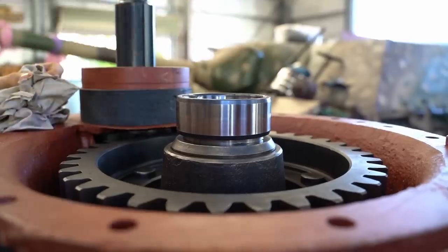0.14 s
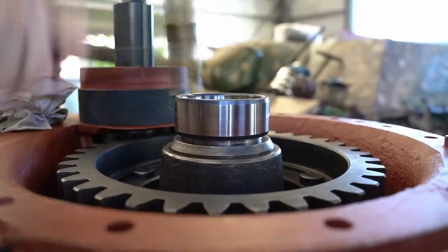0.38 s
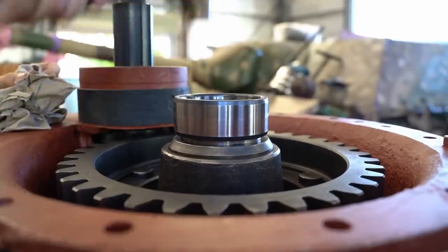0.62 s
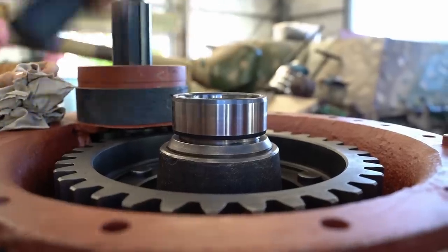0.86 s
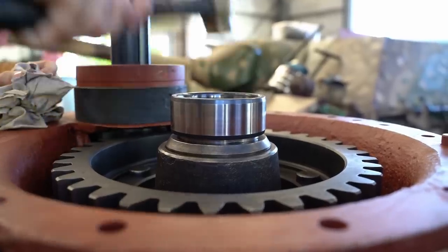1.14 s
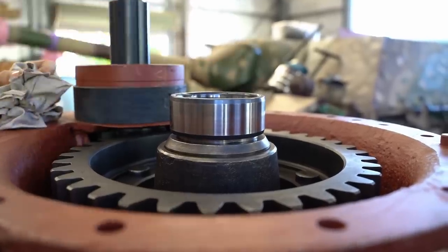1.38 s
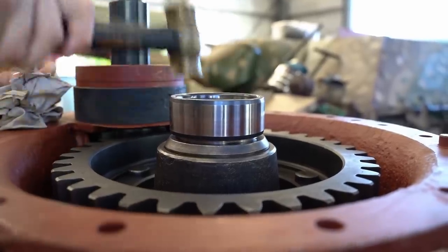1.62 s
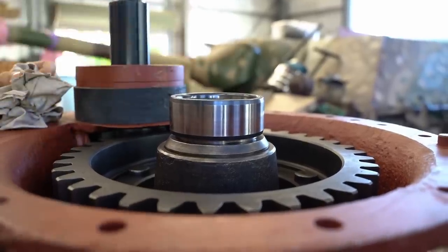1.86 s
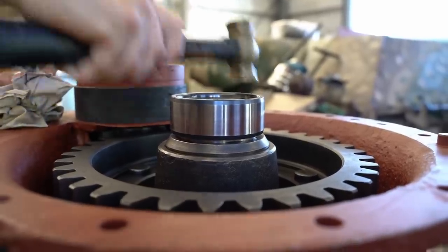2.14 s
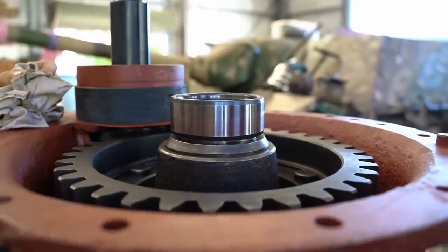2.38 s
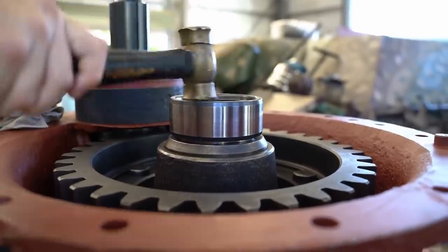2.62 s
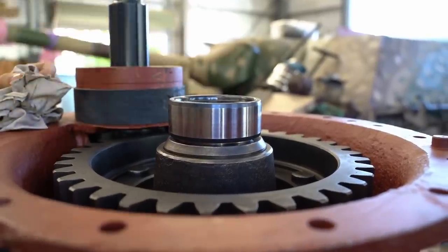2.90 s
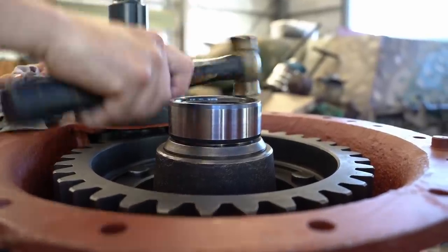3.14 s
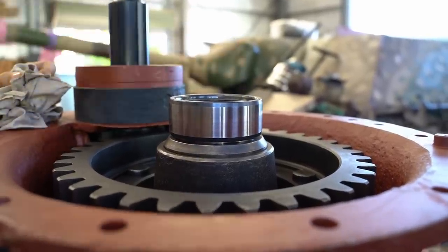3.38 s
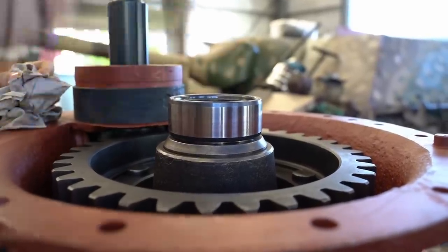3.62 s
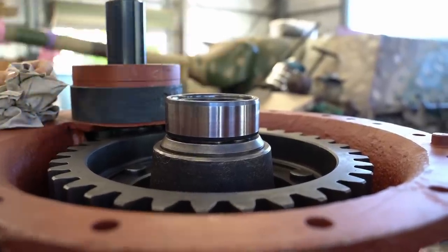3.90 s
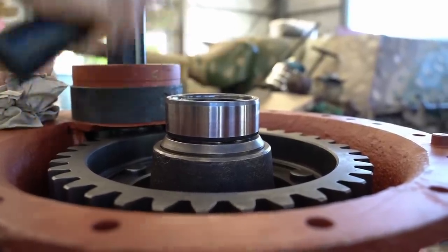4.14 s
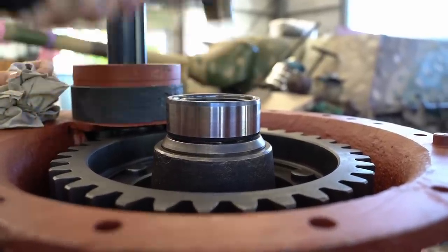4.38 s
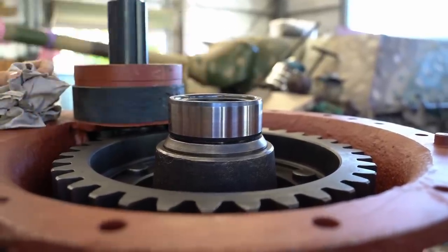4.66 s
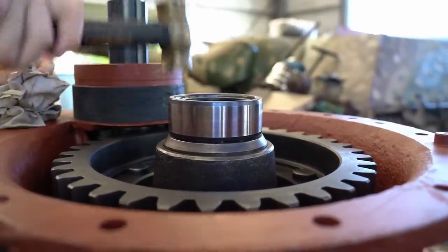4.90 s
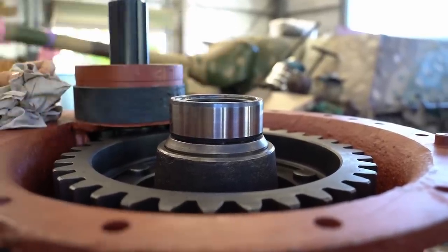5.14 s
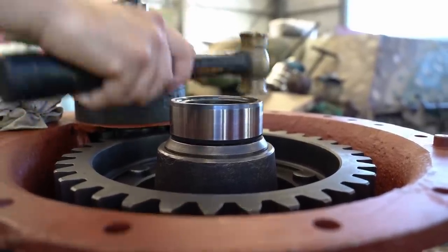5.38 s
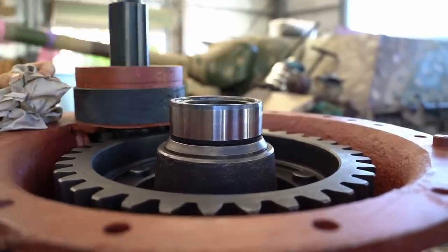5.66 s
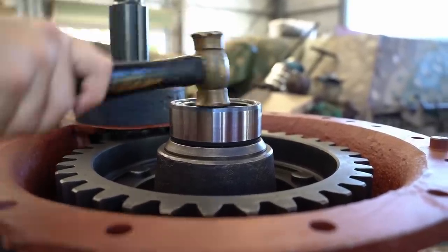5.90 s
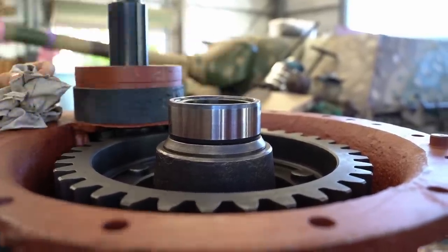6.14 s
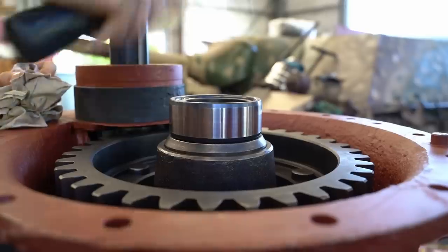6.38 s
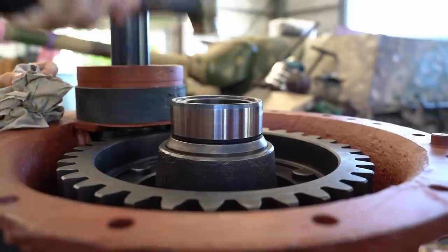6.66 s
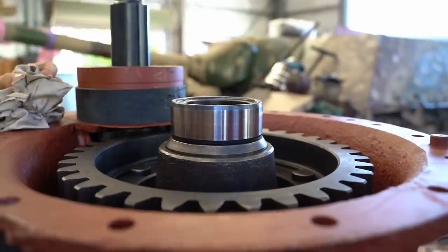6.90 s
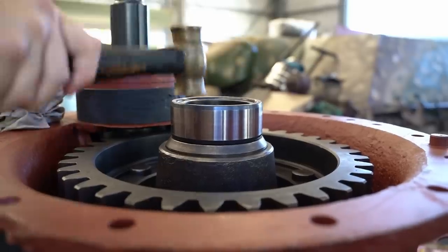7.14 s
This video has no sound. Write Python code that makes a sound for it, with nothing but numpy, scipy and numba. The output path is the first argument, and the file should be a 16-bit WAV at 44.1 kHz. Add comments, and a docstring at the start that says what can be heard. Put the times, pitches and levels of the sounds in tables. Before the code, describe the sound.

At 0 seconds the clang of a blow just struck is dying away, with a faint thin whine lingering until about 0.6. From 0.44 a brass hammer strikes a steel bearing collar on a gear hub, steadily, about every 0.55 seconds, with the last blow near 7.06. Each hit is a sharp, overloaded crack with a spit of noise, a short low thud from the heavy housing, and a dense metallic clang fading within a few tenths. From about 1.0, a lighter bounce taps some 30 to 50 milliseconds after each blow, and loose parts rattle briefly. Alternate hits differ slightly in brightness. High pings are strongest around 2 to 4.3; from 4.8 they weaken, the blows grow duller, and a thin, very high ring creeps upward in pitch. Close microphone, scattered workshop echoes, steady low machine hum underneath.

```python
"""The clang of a blow just struck dies away, then a brass hammer goes on driving a bearing collar
onto the hub of a steel gear, far and near rim in turn. Each blow is a sum of dying sines, for crack,
housing, gear and collar, with bursts of noise; scattered echoes stand for the workshop, which hums low.
A close camera microphone overloads on the crack and its limiter holds down the clang."""
import sys
import numpy as np
from scipy import signal
from scipy.io import wavfile
from scipy.ndimage import uniform_filter1d
from numba import njit

SR = 44100
rng = np.random.default_rng(int(sys.argv[2]) if len(sys.argv) > 2 else 0)


def volts(x):
    """Linear amplitude factor 10**(x/20) for a level x in dB, scalar or array-like."""
    e = np.asarray(x, float) / 20
    return 10 ** e


def materialize(psi):
    """Save the field psi as 16-bit PCM at rate SR to the path in sys.argv[1].

    A 1-D psi becomes a single channel; in a 2-D psi each row is a channel.
    """
    bounded = np.clip(np.atleast_2d(psi).T, -1, 1)
    quanta = np.round(bounded * 32767).astype(np.int16)
    wavfile.write(sys.argv[1], SR, quanta)


N = 321042  # samples
LEAD = SR // 2  # samples of run-up, for the blow that falls before the start

# Loose parts knocking. Each row: frequency in Hz, level in dB, t60 in s.
LOOSE_PARTS = [(640, -4.5, 0.016), (950, -2, 0.011), (1450, 1.5, 0.0078), (2265, -2, 0.013)]


def evened(x):
    """Scales to rms 1."""
    return x / np.sqrt(np.mean(x ** 2) + 1e-20)


def read(points, hz):
    """Reads a table on a log-frequency axis."""
    f, value = np.transpose(points)
    return np.interp(np.log(hz + 1), np.log(f + 1), value)


def add(mix, s, sound):
    """Lays a sound into a mix that begins LEAD samples early."""
    part = mix[LEAD + round(s * SR):][:len(sound)]
    part += sound[:len(part)]


def ring(modes, rise_s, scatter_db, rim=0., size=SR // 2 + SR // 4):
    """Dying sines that swell up first; level, phase and pitch differ a little each time."""
    hz, db, t60, *far_db = np.transpose(modes)[:, :, None]
    t = np.arange(size) / SR
    level_luck, phase, pitch_luck = rng.standard_normal((3, len(modes), 1))
    level_db = db + rim * sum(far_db) + scatter_db * level_luck - 60 * t / t60
    swell = (1 - np.exp(-t / rise_s)) ** 2
    hz = hz * (1 + .0008 * pitch_luck)  # each mode is detuned a hair at random
    return (volts(level_db) * swell * np.sin(2 * np.pi * hz * t + phase)).sum(0)


def fading(x, t60_table, colour=((1, 0), (2, 0))):
    """Colours x and lets each band die at its own speed."""
    hz, t, z = signal.stft(x, SR, nperseg=256, noverlap=192)
    level_db = read(colour, hz)[:, None] - 60 * t / read(t60_table, hz)[:, None]
    return signal.istft(z * volts(level_db), SR, nperseg=256, noverlap=192)[1][:len(x)]


def hammering():
    """All blows; a rebound lands on the rim of the blow before it and knocks the loose parts."""
    # Blows, the first just before the start. Each row: start in seconds, strength in dB,
    # place on the rim (below 0 near, above 0 far), high ping of the gear in dB, its middle ring in dB.
    blows = [(-.105, -1.5, -0.85, 1, -5), (0.4384, -1.5, 0.85, 2.5, -4.5), (0.9785, -1.5, -0.7, 3.8, 2),
             (1.52, -1, 0.62, 1, -0.5), (2.0521, -0.5, -0.37, 7.5, -2), (2.595, -1.5, 0.63, 3, -0.5),
             (3.1472, -1.5, -0.42, 4, 4.5), (3.694, -1, 0.51, 6, 6), (4.2329, -1.5, -0.5, 11.5, 1),
             (4.7915, -1, 0.56, -2.5, 2), (5.35, -3, -1, -5.4, 1), (5.9015, -2, 0.65, -11, -3.5),
             (6.4672, -2.5, -1, -13.5, -0.5), (7.0619, -1.5, 0.82, -8, -4)]
    # Rebounds of the hammer or the loose collar. Each row: start in seconds, strength in dB.
    bounces = [(1.011, -13.5), (2.081, -30), (2.0891, -9), (2.626, -11.5), (3.19, -15), (3.7344, -12.5),
               (4.265, -17), (4.2763, -15), (4.82, -16), (5.406, -16.5), (5.94, -14.5), (6.513, -14.5),
               (7.103, -20.5), (7.122, -33)]
    mix = np.zeros((N + LEAD, 2))  # columns: heard close by, sent into the shop
    add(mix, blows[0][0], whine()[:, None])
    for s, db, *place in blows:
        add(mix, s, volts(db) * blow(s, *place))
    for s, db in bounces:
        place = [row[2:] for row in blows if row[0] < s][-1]
        knock = volts(5.0) * ring(LOOSE_PARTS, 0.00043, 2.5)
        # a weaker rebound has a softer shock, and its crack is dull above 3200 Hz
        soft = blow(s, *place, sharp_db=0.5 * db, top_hz=3200)
        add(mix, s, volts(db) * (soft + knock[:, None]))
    return mix.T


def blow(s, rim, ping_db, middle_db, sharp_db=0., top_hz=None):
    """One contact shocks all the parts; it is heard close by and sent into the shop."""
    at_once = -LEAD / SR  # add() puts this on the first sample
    shock = crack(rim, sharp_db, top_hz) + volts(0.5 * sharp_db) * thud(rim)
    clang = gear(rim, ping_db, middle_db)
    free_ring, fit_ring = collar(s)
    clang += free_ring
    add(clang, at_once, volts(-12) * clatter())
    add(clang, at_once, volts(-13.0) * rattle())
    # the shock is a near field and carries less far
    sound = clang[:, None] + shock[:, None] * volts([0, -8])
    if not top_hz:  # a soft contact does not spit
        # nearby surfaces smear what goes into the shop
        spits = np.transpose([spit(0.0084), volts(-3.5) * spit(0.062)])
        add(sound, at_once, volts(-7) * spits)
    treble = signal.sosfilt(signal.butter(2, 6000, "high", fs=SR, output="sos"), sound, axis=0)
    # more treble at the far rim, less as the collar seats
    bright_db = 6.5 + 2 * rim - 0.89 * s + 0.34 * sharp_db
    return sound + (volts(bright_db) - 1) * treble + fit_ring[:, None]


def crack(rim, sharp_db, top_hz):
    """First shock of steel on brass: very short sines, dulled above top_hz if that is given."""
    # Each row: frequency in Hz, level in dB, t60 in s, dB gained at the far rim.
    modes = [(2286, -8.5, 0.022, -0.5), (2790, 3, 0.0081, 0.5), (3335, 3, 0.0099, -3.5),
             (4540, 4, 0.0084, -7), (4790, 8.5, 0.0031, 0.5), (5150, 1, 0.0057, 2), (8355, -9.5, 0.014, 2)]
    sound = volts(sharp_db) * ring(modes, 0.00013, 1.5, rim)
    if top_hz:
        sound = signal.sosfilt(signal.butter(2, top_hz, fs=SR, output="sos"), sound)
    return sound


def spit(t60):
    """The contact itself: a short burst of coloured noise."""
    # Noise of the contact. Each row: frequency in Hz, level in dB per Hz.
    colour = [(1500, -15), (4000, -3), (7000, -5.5), (9300, -5.5), (10600, -11.5), (13000, -15.5),
              (15600, -20.5), (16100, -45)]
    noise = fading(rng.standard_normal(2048), ((1, 0.91), (2, 1.0)), colour)
    return evened(noise) * volts(-60 * np.arange(len(noise)) / SR / t60)


def thud(rim):
    """The heavy housing answers a moment later: low sines that swell over some 3 ms."""
    # Each row: frequency in Hz, level in dB, t60 in s, dB gained at the far rim.
    modes = [(123, -19, 0.085, 2), (332, -3, 0.027, 0), (1007, -2, 0.018, 8), (1335, 4.5, 0.025, 1.5),
             (1982, -13.5, 0.047, 4)]
    return ring(modes, 0.003, 1.5, rim)


def gear(rim, ping_db, middle_db):
    """Modes of gear and housing, with the high ping and the middle ring set blow by blow."""
    # Frequency of each mode in Hz.
    mode_hz = [150, 396, 512, 635, 769, 945, 1050, 1345, 1380, 1528, 1628, 1922, 2290, 2616, 3153, 3215,
               3624, 4095, 4764, 6170, 6357, 7897, 8222, 8292, 8559, 8730, 8856, 9253, 2225, 2420, 3275,
               4510, 4565, 5180, 4660, 8928]
    # The same modes. Each row: level in dB, t60 in s, dB gained at the far rim.
    mode_rings = [(-32, 0.48, -0.5), (-28, 0.62, -1.5), (-11, 0.13, -0.5), (-23.5, 0.15, -2.5),
                  (-24, 0.17, -3.5), (-29.5, 0.22, 2), (-38, 0.86, -6.5), (-16.5, 0.13, -6),
                  (-11, 0.097, 7), (-32, 0.32, 0.5), (-25, 0.22, 6), (-19.5, 0.18, 0.5), (-31.5, 0.1, 6.5),
                  (-21.5, 0.12, -3.5), (-16, 0.1, -3.5), (-25.5, 0.23, -2), (-29.5, 0.28, 5),
                  (-20, 0.14, 4.5), (-30, 0.23, -2), (-37, 0.27, 5), (-30.5, 0.22, 0), (-38.5, 0.2, 3.5),
                  (-34, .17, 7), (-28.5, .13, 12), (-35, .33, -3), (-37, .14, 1.5), (-34.5, 0.13, 0),
                  (-36.5, 0.27, -2), (-26, 0.066, -7.5), (-26, .1, 3), (-26, .12, 4.5), (-23.5, .14, 6),
                  (-33.5, 0.35, -3), (-34, .25, 2.5), (-33.5, .3, 0), (-36, .13, -2.5)]
    # Bands of the modes that make the high ping and the middle ring: lower edge, upper edge in Hz.
    ping_hz = (8150, 8400)
    middle_hz = (3100, 3300)
    modes = np.column_stack([mode_hz, mode_rings])
    for (lo, hi), db in ((ping_hz, ping_db), (middle_hz, middle_db)):
        modes[:, 1] += db * (modes[:, 0] > lo) * (modes[:, 0] < hi)
    return ring(modes, 0.00083, 1.5, rim)


def collar(s):
    """The collar's free ring, and the ring of the tightening fit, which climbs as it goes home."""
    # Free collar. Each row: frequency in Hz, level in dB, t60 in s.
    modes = [(11660, -50, .15), (11800, -50, .15), (13900, -52, .15), (14271, -50, .22), (14560, -45, .25),
             (14640, -43, .3), (14700, -42, .35), (14770, -44, .25), (14860, -46, .2)]
    # The collar goes home. Each row: time in seconds, its free ring in dB, ring of the fit in dB.
    seating = [(0, -5, -22), (.9, -7, -22), (2.1, 0, -18), (3.2, -1, -14), (3.7, -8, -13), (4.8, -9, -2),
               (5.4, -7, 0), (5.9, -11, -2), (6.5, -4, -6), (7.1, -5, 1)]
    # Pitch of the fit. Each row: time in seconds, frequency in Hz.
    fit_hz = [(3.1, 10600), (7.06, 11110)]
    # Ring of the fit: level in dB, t60 in s.
    fit = (-33.5, 0.3)
    when, *rings_db = np.transpose(seating)
    free_db, fit_db = (np.interp(s, when, db) for db in rings_db)
    fit_mode = [(np.interp(s, *np.transpose(fit_hz)), *fit)]
    return volts(free_db) * ring(modes, 0.00043, 1.5), volts(fit_db) * ring(fit_mode, .0005, 0)


def clatter(rise_s=0.016):
    """Modes too crowded to tell apart merge into a dying noise."""
    # Crowded modes of the housing. Each row: frequency in Hz, level in dB per Hz.
    colour = [(35, -33), (60, -13), (415, 5), (1390, 2.5), (2870, -7), (3220, -4.5), (3450, -12.5),
              (4680, -6.5), (7110, -20.5), (8370, -5.5), (10400, -21.5), (15600, -26), (15900, -46)]
    # Their decay. Each row: frequency in Hz, t60 in s.
    decay = [(150, 0.35), (600, 0.22), (2000, 0.21), (5000, 0.41), (9000, 0.14), (15000, 0.15)]
    noise = fading(rng.standard_normal(SR // 2), decay, colour)
    t = np.arange(len(noise)) / SR
    start_rms = np.sqrt(np.mean(noise[:SR // 50] ** 2))
    return noise / start_rms * (1 - np.exp(-t / rise_s))


def rattle(count=14, from_s=.014, to_s=.05):
    """The shaken parts knock against each other a dozen times or so before they settle."""
    out = np.zeros(LEAD + SR // 4)
    for when, weakness in rng.random((count, 2)):
        knock = ring(LOOSE_PARTS, 0.000346, 2.3, size=SR // 20)
        add(out, from_s + when * (to_s - from_s), volts(-15 * weakness - 3.6 * when) * knock)
    return out[LEAD:]


def whine():
    """A thin whine swells after the first blow, sinks, and stops after 0.75 s."""
    # Each row: frequency in Hz, level in dB, t60 in s.
    modes = [(4985, -47, 2.5)]
    return ring(modes, 0.12, 0)


def shop(x, count=3):
    """Reflections of random sign from 8 ms on; three random echo patterns fade into one another."""
    # Decay of the workshop. Each row: frequency in Hz, t60 in s.
    decay = [(150, 1), (500, 0.86), (1500, 0.53), (4500, 0.68), (9000, 0.56), (15000, 0.42)]
    at = np.arange(350, SR - 20, 20)  # samples
    turn = np.arange(len(x)) / SR * 1.9  # radians; keeps the reverberation changing
    out = np.zeros(len(x))
    for k in range(count):
        taps = np.zeros(SR)
        taps[at + rng.integers(0, 20, len(at))] = rng.choice([-1., 1.], len(at))
        tail = fading(taps, decay)
        share = np.sqrt(2 / count) * np.cos(turn + np.pi * k / count)
        out += signal.fftconvolve(x * share, tail / np.linalg.norm(tail))[:len(x)]
    return out


def air():
    """Broad workshop noise and a wavering machine hum, as random spectra in slowly drifting patches."""
    # Workshop air, its colour. Each row: frequency in Hz, level in dB per Hz.
    colour = [(15, -13.5), (30, -1.5), (60, -2.5), (100, -14.5), (200, -10), (350, -8), (520, -12.5),
              (1000, -16), (2500, -21), (3700, -26.5), (4800, -23.5), (6500, -38), (9000, -44.5),
              (15500, -53)]
    # Distant machine. Each row: frequency in Hz, nominal width in Hz, level in dB.
    hum = [(81, 4, -62), (139.5, 13, -53.5), (243, 4, -51.5), (253.5, 6, -50), (327, 4, -46.5),
           (352, 4, -55.5), (382, 5, -53), (453.3, 3.2, -54), (480.8, 4, -59.5), (624, 4, -66.5),
           (736.3, 6, -59), (980, 6, -65.5), (980, 3, -65.5)]
    hz = np.fft.rfftfreq(4096, 1 / SR)
    a, b, patches = rng.standard_normal((N // 1024 + 5, len(hz), 3)).T
    patches = uniform_filter1d(uniform_filter1d(patches, size=12, axis=0), size=4, axis=1)
    patches = volts(0.46 * evened(patches))  # 0.46 dB rms of drift
    broad = volts(read(colour, hz))
    broad *= volts(-45.5) / np.linalg.norm(broad)
    power = broad ** 2
    for f, width, db in hum:
        line = 1 / (1 + (2 * (hz - f) / width) ** 2) ** 2
        power += volts(2 * db) * line / line.sum()
    spectra = (a + 1j * b) * patches * np.sqrt(power)[:, None]
    noise = signal.istft(spectra, nperseg=4096, noverlap=3072)[1][:N]
    return evened(noise) * np.sqrt(power.sum())


def scene():
    """Close hammering, its echo in the shop, and the background."""
    near, far = hammering()
    struck = near + volts(-16.5) * shop(far)
    return (struck[LEAD:] + air())[None]


@njit
def follow(wanted_db, fall, recover):
    """Chases the wanted gain cut, with one speed for cutting and another for letting go."""
    out, held = np.empty_like(wanted_db), 0.
    for i in range(len(wanted_db)):
        held += (wanted_db[i] - held) * (fall if wanted_db[i] > held else recover)
        out[i] = held
    return out


def low_pass(x):
    """Removes everything above the highest recorded frequency."""
    return signal.sosfilt(signal.butter(12, 16390, fs=SR, output="sos"), x)


def record(dry):
    """The microphone's limiter needs some milliseconds to act, so the crack clips."""
    power = signal.lfilter([1 / 90], [1, 1 / 90 - 1], dry[0] ** 2)  # smoothed over 90 samples
    over_db = np.maximum(10 * np.log10(power + 1e-12) + 24.0, 0)  # above -24 dB
    # cuts with a time constant of 16 ms, lets go with 3.3 ms
    cut_db = follow(0.22 * over_db, 1 / (0.016 * SR), 1 / (0.0033 * SR))
    return low_pass(np.clip(dry / volts(cut_db), -1, 1))


dry = scene()
out = record(dry)
materialize(out)
```